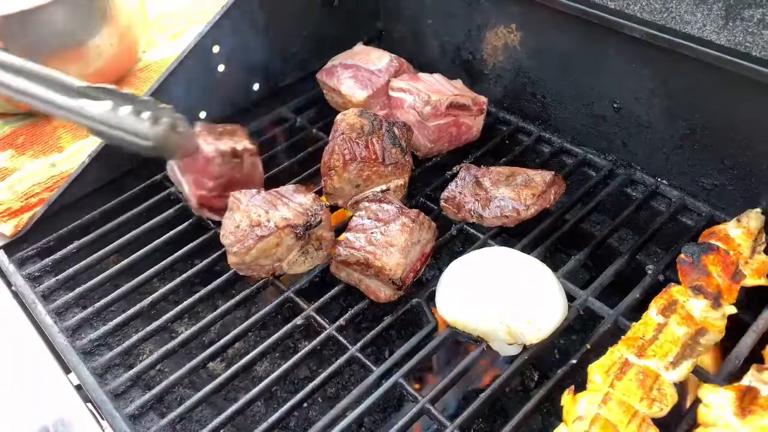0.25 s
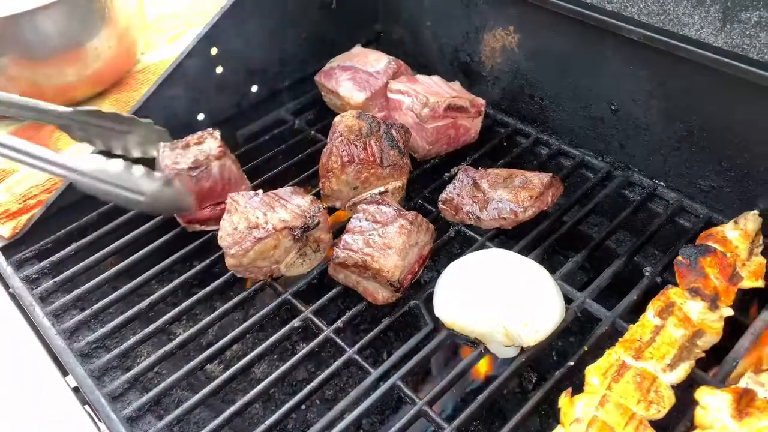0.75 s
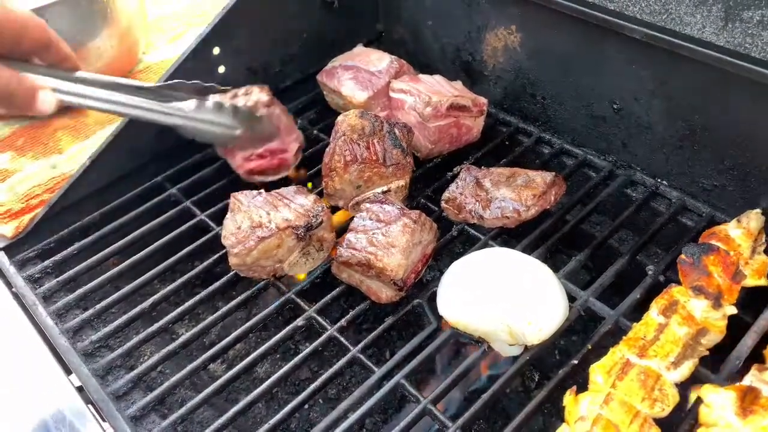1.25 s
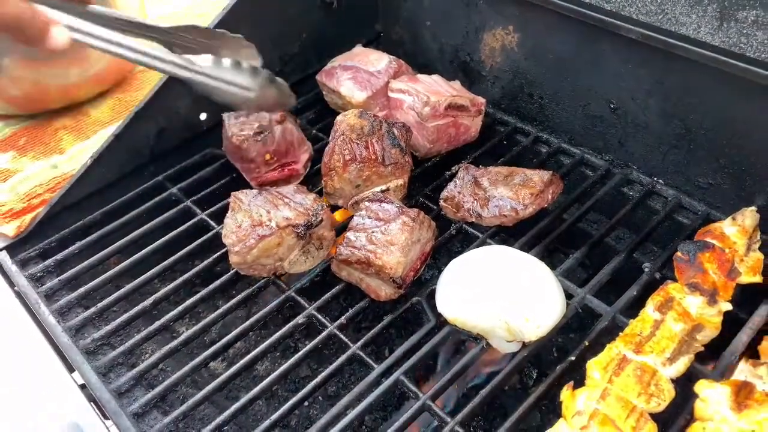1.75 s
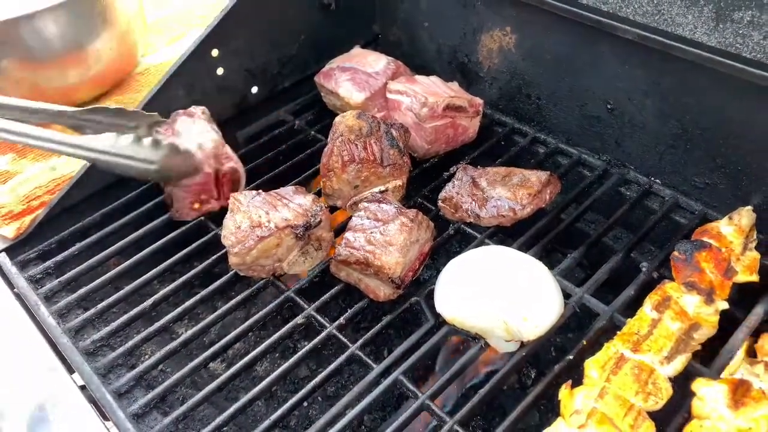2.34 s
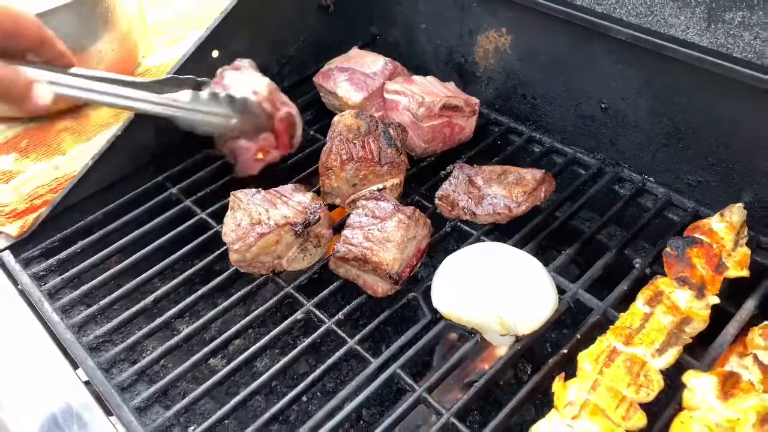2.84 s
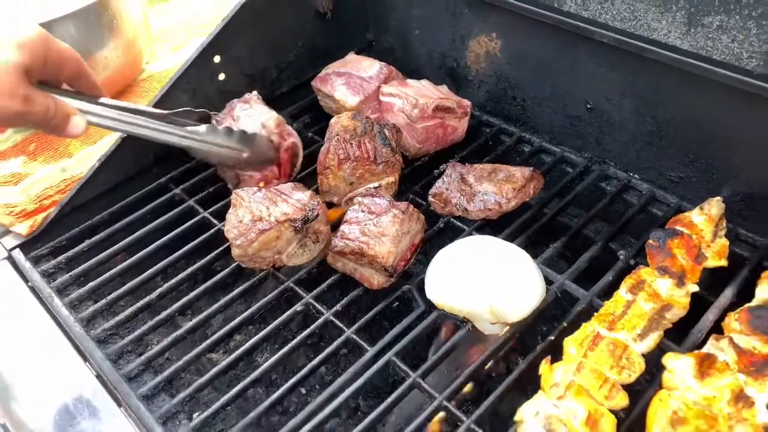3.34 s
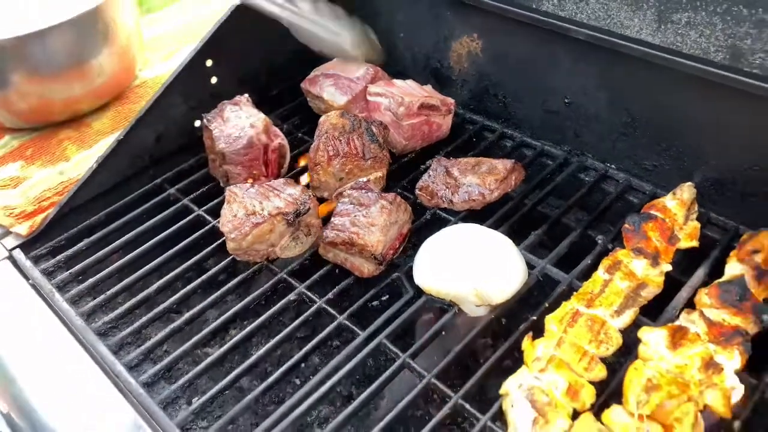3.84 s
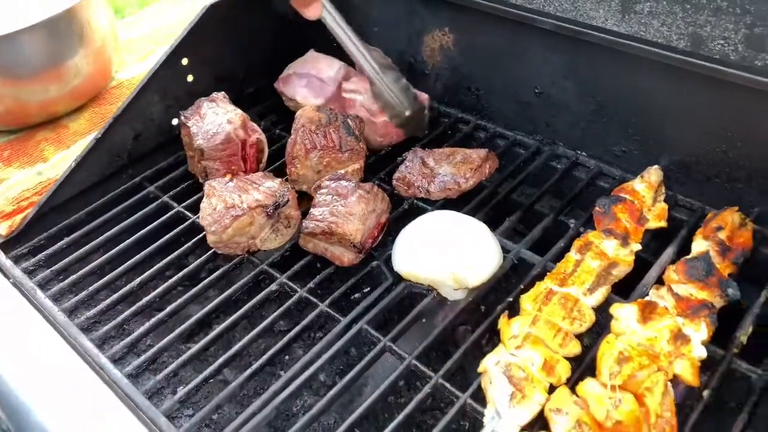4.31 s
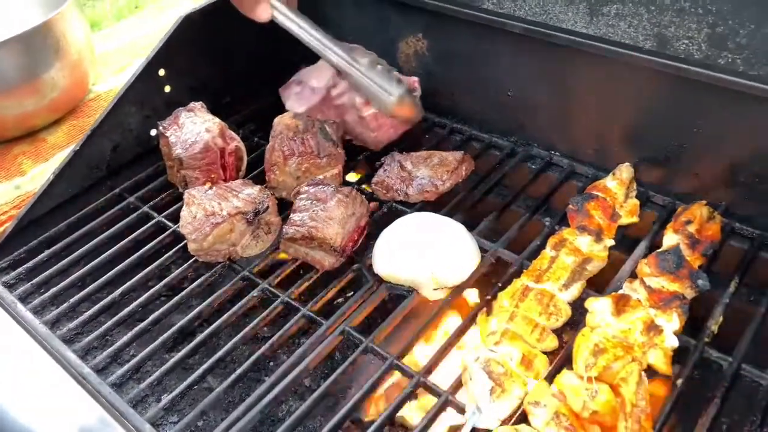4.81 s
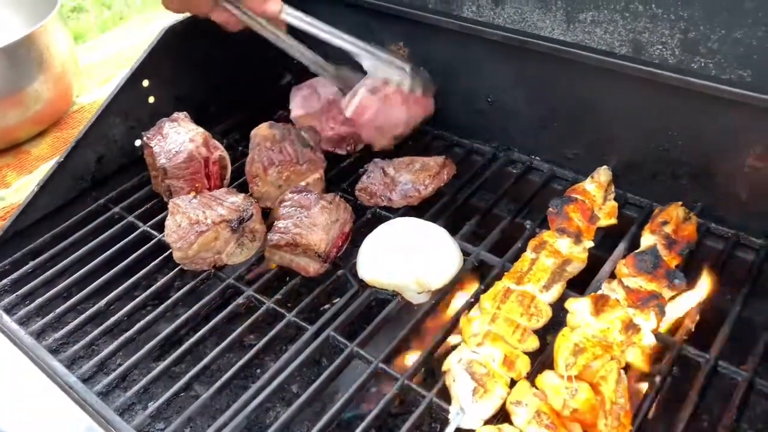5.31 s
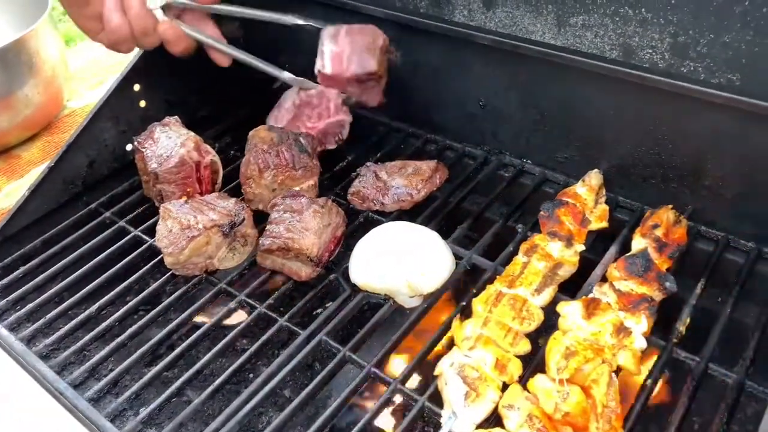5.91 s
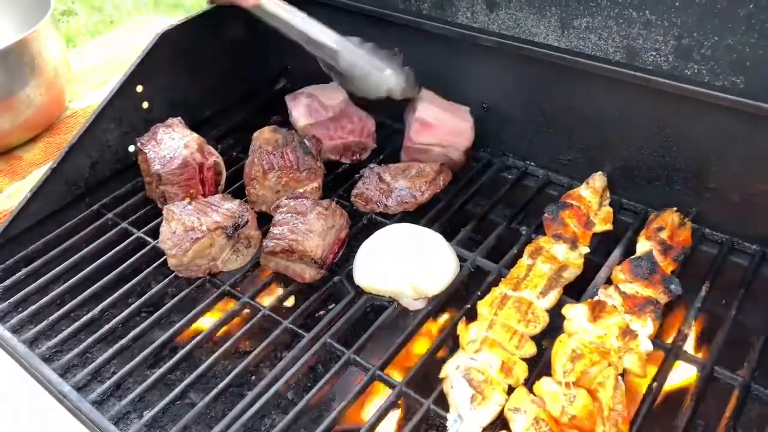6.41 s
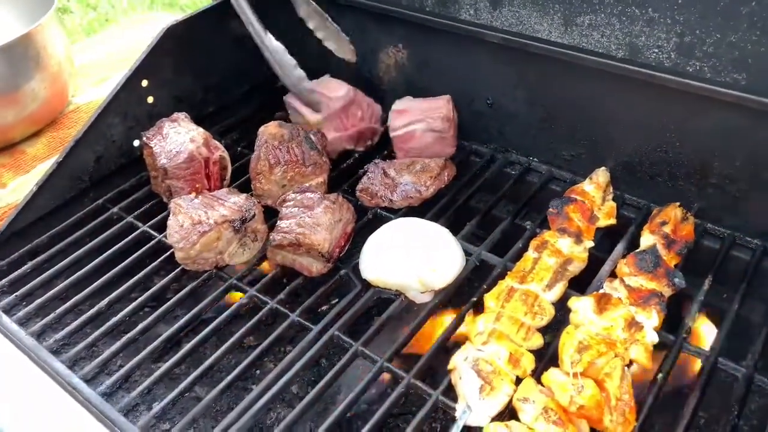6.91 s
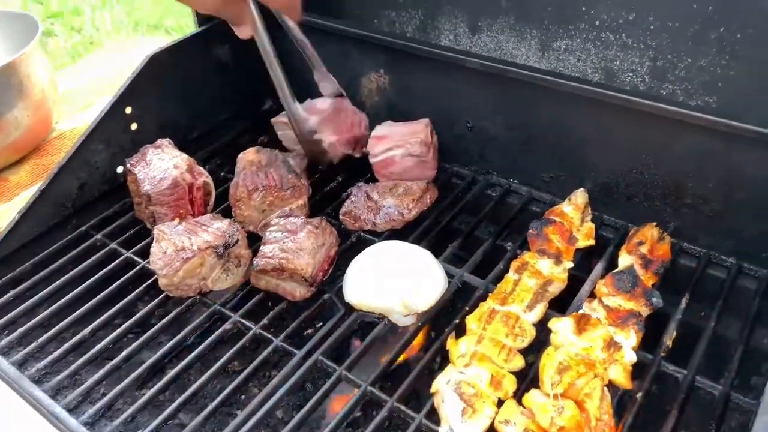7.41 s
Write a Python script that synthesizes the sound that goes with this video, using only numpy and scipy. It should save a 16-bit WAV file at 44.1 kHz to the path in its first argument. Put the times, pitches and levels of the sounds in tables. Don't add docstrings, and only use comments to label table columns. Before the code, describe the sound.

Meat sizzles and spits over a roaring gas grill outdoors while metal tongs scrape and knock the ringing grate and wind gusts thump the microphone.

```python
import sys
import numpy as np
from scipy import signal
from scipy.fft import rfft, irfft, next_fast_len
from scipy.io import wavfile
from scipy.ndimage import uniform_filter1d

SR = 44100
rng = np.random.default_rng(int(sys.argv[2]) if len(sys.argv) > 2 else 0)


def store_wav(level_fs):
    pcm = np.round(np.clip(np.atleast_2d(level_fs), -1, 1) * 32767)
    wavfile.write(sys.argv[1], SR, pcm.T.astype(np.int16))


def volts_from_db(level):
    exponent = np.asarray(level, float) / 20
    return 10 ** exponent


N = 337806

# (time [s], level [dB])
BREEZE = [
    (0, -41.5),
    (.6, -41.5),
    (2.0, -42.5),
    (3.6, -38.5),
    (4.47, -40.5),
    (4.5, -61),
    (4.66, -52),
    (4.85, -40),
    (5.9, -40.5),
    (7.66, -42),
]
# (middle [s], length [s], level [dB])
GUSTS = [(.02, 0.071, -39.5), (0.135, 0.036, -46), (0.276, 0.065, -32.5), (1.768, 0.065, -39),
         (2.072, .1, -42.5), (2.26, 0.06, -37), (2.52, 0.2, -41), (2.724, 0.085, -36),
         (2.988, 0.086, -37.5), (3.107, 0.048, -39), (4.074, 0.07, -34), (4.373, 0.098, -24.5),
         (4.444, 0.055, -32.5), (4.768, 0.059, -32.5), (4.92, .1, -33), (5.035, 0.091, -32.5),
         (5.139, 0.088, -27.5), (5.259, 0.1, -23), (5.413, 0.076, -37), (5.59, .12, -27.5),
         (5.704, 0.14, -31.5), (6.095, .2, -40), (6.28, 0.091, -34), (6.38, 0.05, -29.5),
         (6.508, 0.11, -31), (6.582, 0.044, -31), (6.697, 0.097, -29.5), (6.795, 0.027, -29.5),
         (6.9, 0.098, -31), (7.04, 0.086, -30.5)]
# (time [s], peak level [dB], pitch [Hz])
BUFFETS = [(0.113, -20, 249), (0.219, -16, 172), (0.449, -18.5, 91), (2.018, -30, 70.4), (2.534, -23, 210),
           (2.6, -25, 190), (2.72, -23, 150), (3.538, -19, 49.7), (3.665, -34, 68), (3.962, -17.5, 64),
           (4.219, -18.5, 51), (4.35, -38, 51.5), (4.351, -12.5, 138), (4.666, -23, 96.9),
           (4.862, -28, 153), (5.011, -28, 67.3), (5.096, -28, 143), (5.235, -14.5, 56.5),
           (5.405, -12.5, 66), (5.578, -14, 75.4), (6.359, -19, 194), (6.466, -17.5, 69),
           (6.577, -11.5, 100), (6.632, -9.5, 90), (6.861, -15.5, 90.5), (7, -31, 83.4), (7.545, -17, 62.4),
           (0.29, -24, 170), (4.41, -14, 150), (5.64, -17, 59.7)]
# (frequency [Hz], density [dB per Hz])
TURBULENCE = [(18, -14), (30, -26), (55, 4.5), (100, -2.5), (200, -7.5), (330, -18.5), (600, -28.5),
              (900, -61)]
# (time [s], level [dB])
GUARD = [
    (4.325, -1),
    (4.36, -8),
    (4.6, -9),
    (4.71, -3),
]
# (frequency [Hz], density [dB per Hz])
ROAR = [(100, -4), (250, 1), (380, -9.5), (500, -2), (1000, -8.5), (1600, -11), (2300, -9.5), (4000, -19),
        (7000, -21)]
# (frequency [Hz], width [Hz], level [dB])
DRONE = [(63.2, 3, -50), (122.7, 6.4, -50.5), (180.7, 4.9, -57.5)]
# (frequency [Hz], level [dB], t60 [s])
GRATE_MODES = [(328, -3, 0.36), (493, 21.5, 0.094), (700, -15, 0.11), (768, 1, 0.24), (898, 6, 0.43),
               (982, 1.5, 0.24), (1182, 7.5, 0.075), (1378, 8.5, 0.11), (1570, -5, 0.098),
               (1780, -39, 0.051), (1913, 15.5, 0.021), (2137, 15, 0.091), (2300, -26, .08),
               (3050, -28.5, .08), (2940, -39, 0.16)]
# (frequency [Hz], density [dB per Hz])
SHEET_STEEL = [(200, -32), (330, 3), (500, 4.5), (1200, 1.5), (2000, -2), (2600, -50), (4500, -34),
               (7000, -50)]
# (start [s], length [s], share of stroke at peak pressure [1], level [dB], ring [Hz])
DRAGS = [
    (0, 0.079, 0.047, -40.5, 1930),
    (0.101, 0.077, 0.24, -41.5, 1610),
    (2.329, 0.33, 0.44, -35, 1800),
    (4.69, 0.24, 0.31, -45, 1680),
    (4.88, .2, 0.41, -46.5, 1500),
    (6.0, 0.38, 0.086, -38, 1590),
    (6.245, 0.26, 0.12, -37, 1430),
    (7.15, 0.25, 0.35, -35.5, 1670),
]
# (frequency [Hz], density [dB per Hz])
GRIT_SPECTRUM = [(1500, -16), (3000, 2), (5500, -6), (9000, -9)]
# (time [s], peak [dB], low ring [Hz], high ring [Hz], relative lid thump [dB])
KNOCKS = [(0.119, -51, 452, 1390, -16), (1.297, -31.5, 700, 1370, -22), (1.956, -48, 974, 2260, -11),
          (2.228, -43.5, 501, 1470, 11.5), (4.004, -43.5, 904, 2050, -17), (4.71, -38, 1300, 1510, -3),
          (5.109, -25.5, 520, 1170, -6), (5.693, -29, 740, 1770, -16), (6.006, -34, 670, 1380, -7),
          (6.129, -33.5, 650, 2280, -13), (6.248, -33, 950, 1340, -1.5), (6.831, -25, 1250, 1750, -22),
          (6.835, -22, 1060, 1330, -17), (7.19, -31, 534, 1260, -16), (7.235, -27, 1180, 1860, -16)]
# (frequency [Hz], level [dB], t60 [s])
TONG_MODES = [(2540, -3, 0.038), (2770, 1, 0.2), (3066, 3.5, 0.04), (4020, -16, 0.84), (4190, -2, 0.075),
              (4700, -26, 0.12), (5160, -18, 0.36)]
# (time [s], peak level [dB], relative low body [dB])
SPITS = [(0.0573, -28, -20), (0.2982, -38, -22), (0.6033, -24.5, -28), (1.035, -27.5, -15),
         (1.1947, -35, -19), (0.735, -31.5, -10), (1.7528, -28, -32), (2.2014, -35, -30),
         (2.2149, -33, -30), (2.3443, -31, -30), (2.6822, -31.5, -38), (2.816, -29, -28), (3.655, -36, -22),
         (3.918, -33, -21), (4.008, -33.5, -18), (4.1413, -26.5, -31), (4.262, -32, -22),
         (4.6648, -35, -29), (4.7198, -29, -25), (5.0474, -31.5, -24), (5.1425, -27, -23),
         (5.2302, -23, -19), (5.278, -24, -24), (6.17, -27.5, -11), (6.972, -30, -10), (6.528, -30.5, -21),
         (7.1762, -24, -33.5), (7.235, -23, -2.5), (7.35, -25.5, -25), (7.418, -24.5, -30)]
# (time [s], level [dB])
BOIL = [(0, -40.5), (.4, -43), (1.1, -49), (1.75, -48.5), (2.4, -48.5), (3.2, -49.5), (3.62, -51),
        (3.9, -48), (4.2, -49), (4.3, -44), (4.42, -48.5), (5.08, -45.5), (5.23, -37.5), (5.4, -40.5),
        (5.74, -39), (6.3, -46), (6.7, -43.5), (7.3, -43.5)]
# (frequency [Hz], density [dB per Hz])
SIZZLE = [(1500, -30), (2600, -12), (3200, -8), (4500, -8), (5600, -8.5), (6400, -5.5), (7300, -3.5),
          (8200, -.5), (11000, 0), (15600, .5)]
# (frequency [Hz], level of the shared part [dB])
SHARED = [(300, -1), (600, -7), (2500, -6), (5500, -9), (7000, -5.5), (8500, -1.2), (16000, -1)]
# (frequency [Hz], level [dB])
PORT_TILT = [(400, 0), (700, 1.5), (1300, .6), (2400, .6), (4400, 1), (8000, 0)]

PORT_GAP_S = .0002165
ROAR_DB, ROAR_PER_SIZZLE, ROAR_PER_WIND = -48.5, 0.46, 0.09
REBOUND_T60_S = 0.33
CLAP_S, CLAP_DB = 7.233, -33
LIFT_DB, LOW_RING = -20, .44
GRIT, SHAKE = 0.34, 0.55


def evened(x):
    return x / np.sqrt(np.mean(x ** 2) + 1e-20)


def curve(rows):
    time, level = np.transpose(rows)
    return np.interp(np.arange(N) / SR, time, level)


def colour(x, points, lag=0.):
    size = next_fast_len(N + 4096)
    hz = np.fft.rfftfreq(size, 1 / SR)
    f, db = np.transpose(points)
    gain = volts_from_db(np.interp(np.log(hz + 1), np.log(f), db))
    delay = np.exp(-2j * np.pi * hz * lag)
    return irfft(rfft(x, size) * gain * delay, size)[..., :N]


def ports(near, other, points, lag):
    apart = [(f, 10 * np.log10(1 - volts_from_db(2 * db))) for f, db in SHARED]
    left = colour(near, SHARED, lag) + colour(other, apart)
    return evened(colour(np.array([left, near]), points))


def add(mix, s, sound):
    part = mix[..., round(s * SR):][..., :sound.shape[-1]]
    part += sound[..., :part.shape[-1]]


def drift(width):
    size = int(width * SR)
    smooth = uniform_filter1d(rng.standard_normal(N), size)
    return evened(uniform_filter1d(smooth, size))


def resonate(x, hz, width):
    r = np.exp(-np.pi * width / SR)
    return 2 * signal.lfilter([1 - r], [1, -r * np.exp(2j * np.pi * hz / SR)], x).real


def crackle(per_s, spread_db, burst_s):
    happens = rng.random(N) < per_s / SR
    power = volts_from_db(2 * spread_db * np.minimum(rng.exponential(1, N), 5)) * happens
    puff = signal.lfilter([1], [1, -np.exp(-2 / (burst_s * SR))], power)
    return evened(np.sqrt(puff) * rng.standard_normal(N))


def wind_db():
    t = np.arange(N) / SR
    power = volts_from_db(2 * curve(BREEZE))
    for s, length, db in GUSTS:
        power = power + volts_from_db(2 * db) * np.exp(-(2.42 * (t - s) / length) ** 2)
    return 10 * np.log10(power)


def wind():
    lumps = volts_from_db(wind_db() - 5.0 + 3.4 * drift(0.012))
    mid, side = evened(colour(rng.standard_normal((2, N)), TURBULENCE))
    out = np.array([mid + volts_from_db(-9) * side, mid - volts_from_db(-9) * side]) * lumps
    for (s, db, hz), turn in zip(BUFFETS, rng.random(len(BUFFETS))):
        cycles = np.arange(int(3 * SR / hz)) * hz / SR
        bell = np.exp(-((cycles - .9) / 0.82) ** 2)
        buffet = volts_from_db(db - 9.0) * np.cos(2 * np.pi * (cycles + turn)) * bell
        add(out, s, buffet * np.ones((2, 1)))
    return out


def burner():
    fed_by_fat = ROAR_PER_SIZZLE * (curve(BOIL) + 47)
    fed_by_wind = ROAR_PER_WIND * (wind_db() + 44)
    flutter_db = 2.06 * drift(0.018) + 1.06 * drift(0.18)
    roar = ports(*rng.standard_normal((2, N)), ROAR, -0.00013)
    roar = roar * volts_from_db(ROAR_DB + fed_by_fat + fed_by_wind + flutter_db)
    drone = sum(volts_from_db(db) * evened(resonate(rng.standard_normal(N), hz, width)) for hz, width, db in DRONE)
    return roar + drone


def firebox():
    hz, t, z = signal.stft(rng.standard_normal((3, 8192)), SR, nperseg=256)
    f, db = np.transpose(SHEET_STEEL)
    t60 = 0.22 * (500 / (hz[:, None] + 200)) ** .5
    decay = volts_from_db(np.interp(hz, f, db)[:, None] - 60 * t / t60)
    wash = signal.istft(z * decay, SR, nperseg=256)[1]
    return wash[0] + .7 * wash[1:]


def grate(push, low_hz, high_hz, luck, t60_share):
    push = signal.lfilter(*signal.butter(3, 1.2 * high_hz, fs=SR), push)
    out = np.zeros((2, len(push)))
    for (hz, db, t60), chance in zip(GRATE_MODES, luck):
        near_db = -22 * min(np.log2(hz / low_hz) ** 2, np.log2(hz / high_hz) ** 2)
        ring = resonate(push * volts_from_db(near_db), hz, 2.2 / (t60 * t60_share)) * np.sqrt(t60)
        blend = 1 + .5 * chance[1:, None]
        out += volts_from_db(db / 2 + 1.5 * chance[0]) * blend * ring
    box = signal.fftconvolve(push[None], firebox(), axes=1)[:, :len(push)]
    box = box + 2.6 * resonate(box, low_hz, 230) + 1.94 * resonate(box, high_hz, 320)
    return evened(out) + 1.32 * evened(box)


def drags():
    out = np.zeros((2, N))
    for s, length, peak, db, hz in DRAGS:
        t = np.arange(0, length, 1 / SR)
        press_db = np.interp(t / length, [0, peak, 1], [LIFT_DB, 0, LIFT_DB])
        slips = crackle(700, 2.5, 0.0058)
        grit = evened(colour(slips, GRIT_SPECTRUM))[:len(t)]
        slips = slips[:len(t)]
        ring = grate(slips, LOW_RING * hz, hz, rng.standard_normal((len(GRATE_MODES), 3)), 0.56)
        lid = SHAKE * evened(resonate(slips, 257, 49))
        stroke = evened(ring) + GRIT * volts_from_db(press_db) * grit + lid
        add(out, s, volts_from_db(db + press_db) * stroke * signal.windows.tukey(len(t), .1))
    return out


def knocks():
    out, t = np.zeros((2, N)), np.arange(12000) / SR
    blow = np.minimum(t / .001, 1) * np.exp(-t / .005)
    for s, db, low_hz, high_hz, lid_db in KNOCKS:
        push = rng.standard_normal(len(t)) * (blow + 0.22 * volts_from_db(-60 * t / REBOUND_T60_S))
        ring = grate(push, low_hz, high_hz, rng.standard_normal((len(GRATE_MODES), 3)), 0.86)
        ring = ring / np.sqrt(np.mean(ring[:, :700] ** 2))
        lid = volts_from_db(lid_db + 1.5 - 60 * t / 0.37) * np.sin(2 * np.pi * 265 * t)
        add(out, s, volts_from_db(db - 5.0) * (ring + lid))
    rattle = rng.standard_normal((2, len(t))) * blow ** 0.51
    clap = sum(volts_from_db(db) * evened(resonate(rattle, hz, 2.8 / min(t60, .06))) for hz, db, t60 in TONG_MODES)
    add(out, CLAP_S, volts_from_db(CLAP_DB - 8.5) * evened(clap))
    return out


def spits():
    crack, body, t = np.zeros(N), np.zeros(N), np.arange(1500) / SR
    shape = (1 - np.exp(-t / .0003)) * (np.exp(-t / .0016) + .25 * np.exp(-t / .008))
    for (s, db, body_db), noise in zip(SPITS, rng.standard_normal((len(SPITS), 1500))):
        add(crack, s, volts_from_db(db + 4.0) * shape * noise)
        add(body, s, volts_from_db(db + body_db + 6.5) * shape ** 0.32 * noise)
    low = [(1200, -36), (2500, -7), (6000, -6.5), (7500, -4.5)]
    return np.array([colour(crack, SIZZLE, lag) + colour(body, low, lag) for lag in (PORT_GAP_S, 0)])


def sizzle():
    near, other = (0.83 * rng.standard_normal(N) + 0.57 * crackle(700, 3.9, 0.00053) for _ in "lr")
    clumps_db = 1.2 * drift(0.0071) + 0.75 * drift(0.056)
    return ports(near, other, SIZZLE, PORT_GAP_S) * volts_from_db(curve(BOIL) + 8.0 + clumps_db)


def scene():
    left, right = wind() + burner() + drags() + knocks() + spits() + sizzle()
    left_tilt = [(hz, -db) for hz, db in PORT_TILT]
    return np.array([colour(left, left_tilt), colour(right, PORT_TILT)])


def roll_off(x):
    return signal.sosfilt(signal.butter(12, 15900, fs=SR, output="sos"), x)


def record(dry):
    t = np.arange(N) / SR
    middle = colour(dry, [(250, -60), (450, -1), (7900, 1), (8100, -60)])
    guarded = dry + middle * (volts_from_db(curve(GUARD)) - 1)
    low_side = colour(dry - dry.mean(0), [(450, 0), (600, -80)])
    guarded -= low_side * np.interp(t, [4.48, 4.52], [0, 1])
    guarded = .3 * np.tanh(guarded / .3)
    guarded = colour(guarded, [(15850, 0), (16050, -80)])
    return roll_off(guarded)


dry = scene()
out = record(dry)
store_wav(out)
```